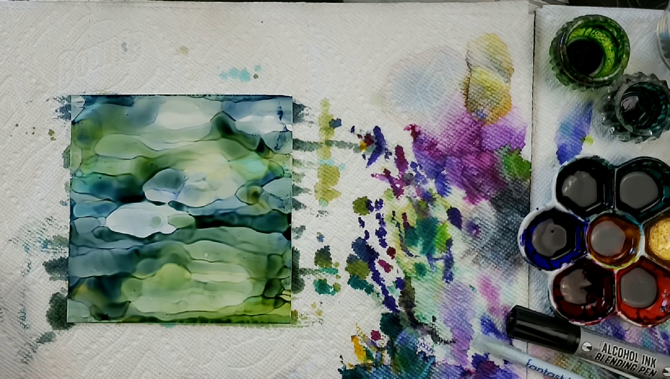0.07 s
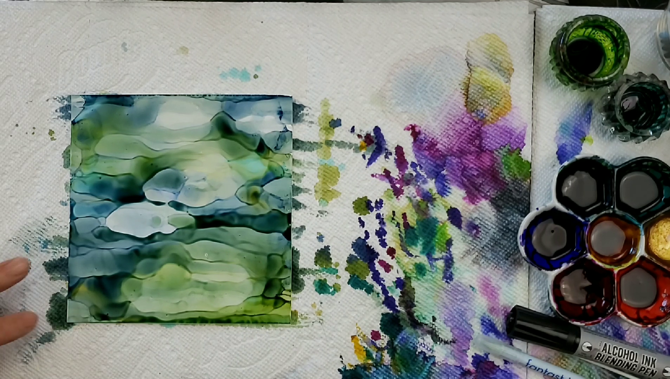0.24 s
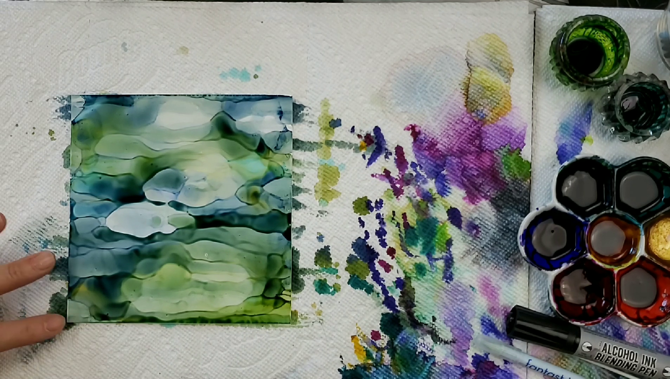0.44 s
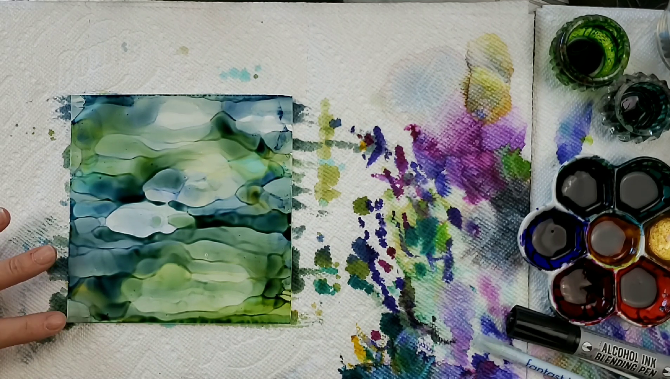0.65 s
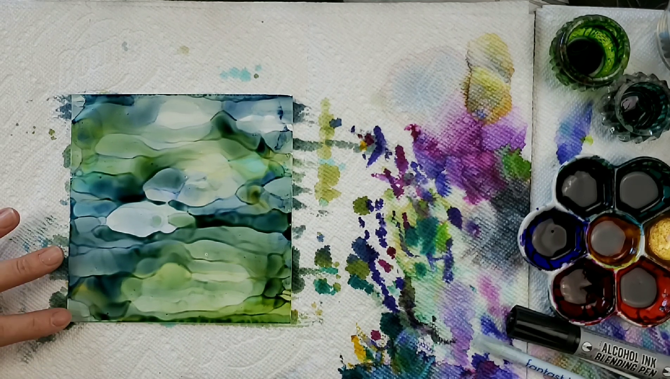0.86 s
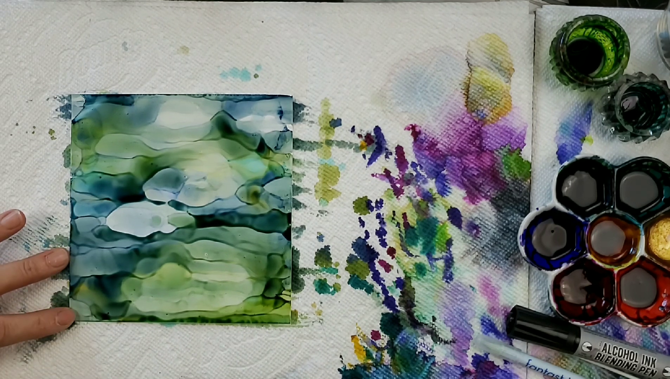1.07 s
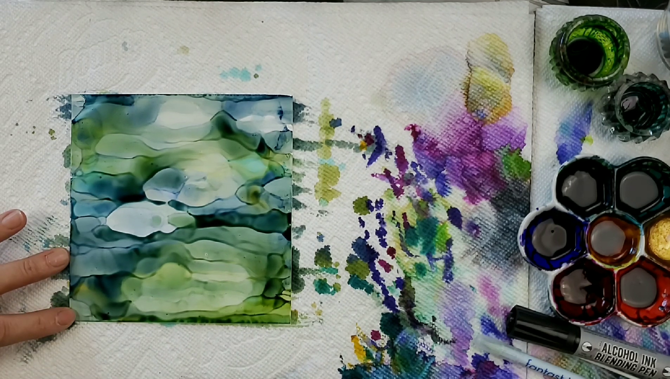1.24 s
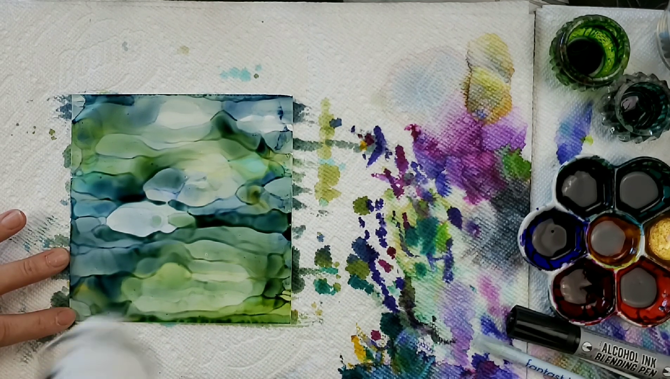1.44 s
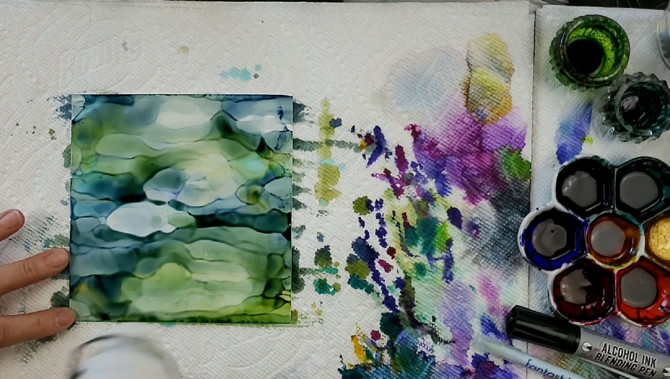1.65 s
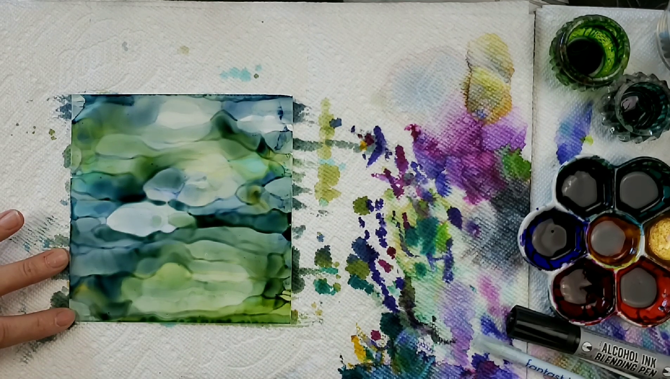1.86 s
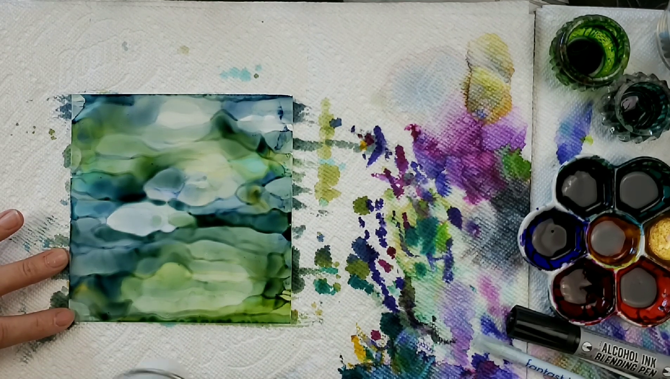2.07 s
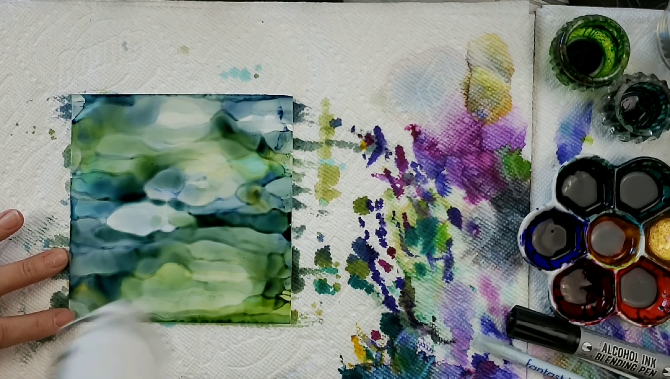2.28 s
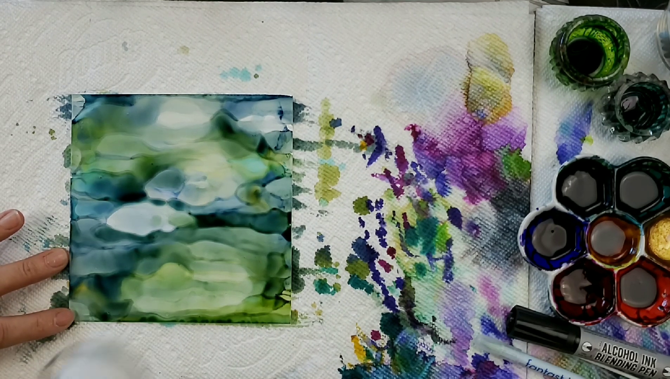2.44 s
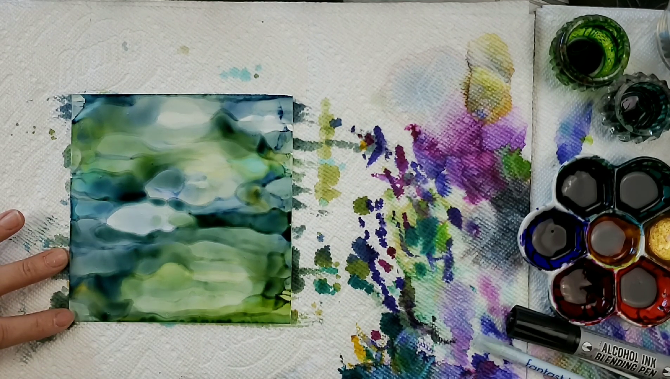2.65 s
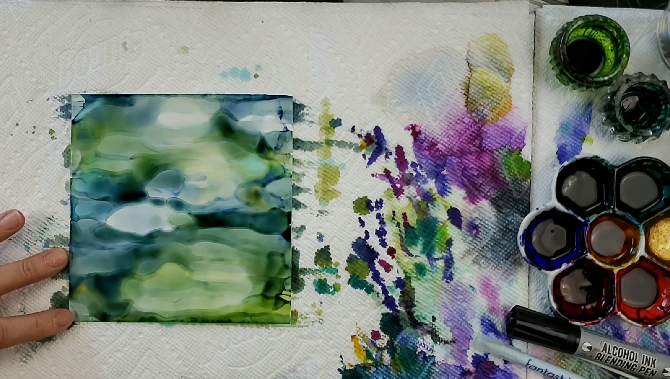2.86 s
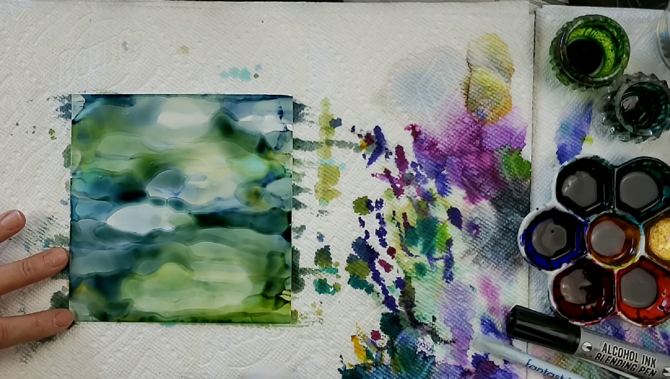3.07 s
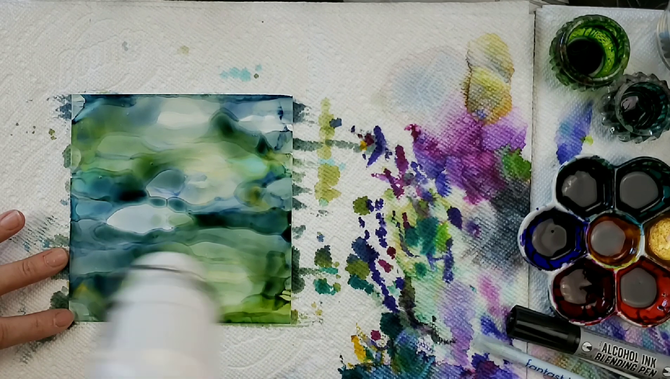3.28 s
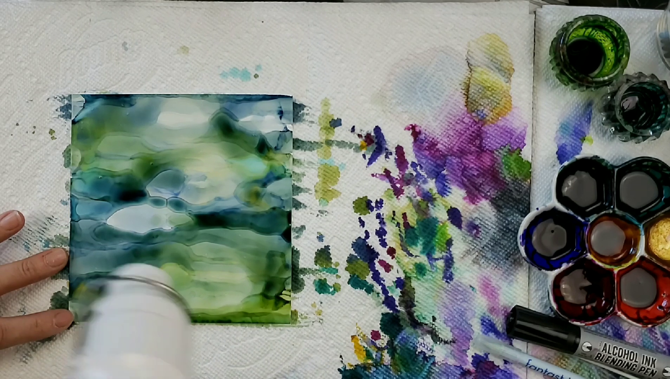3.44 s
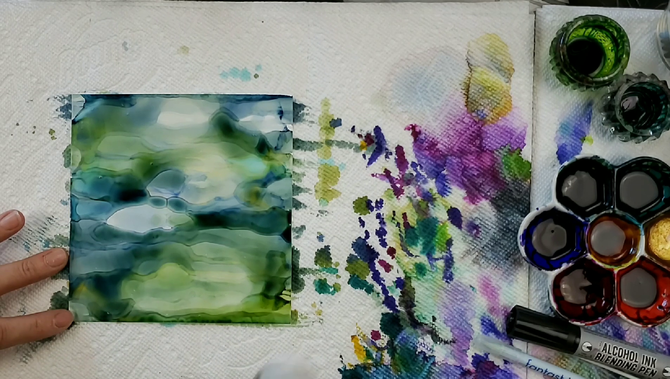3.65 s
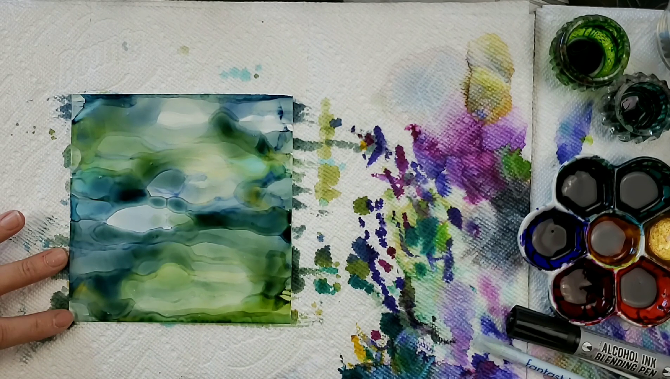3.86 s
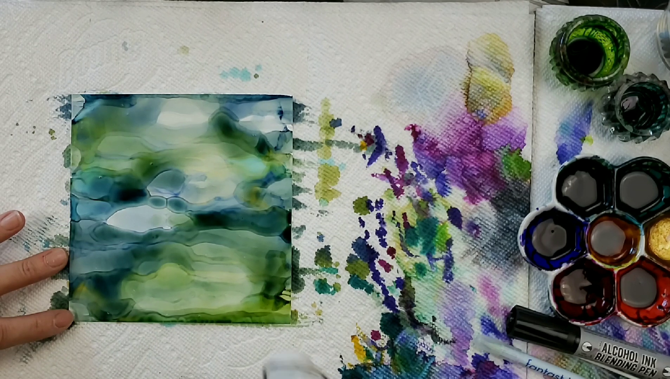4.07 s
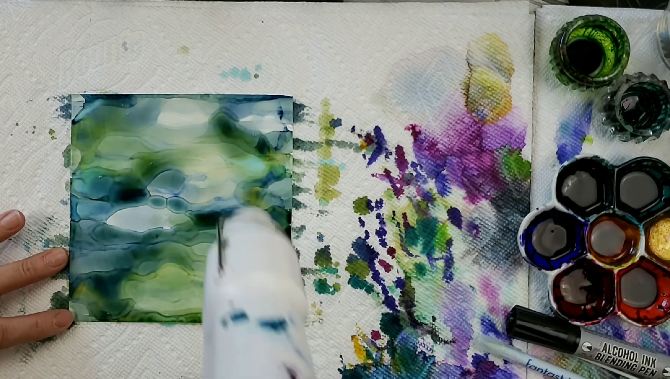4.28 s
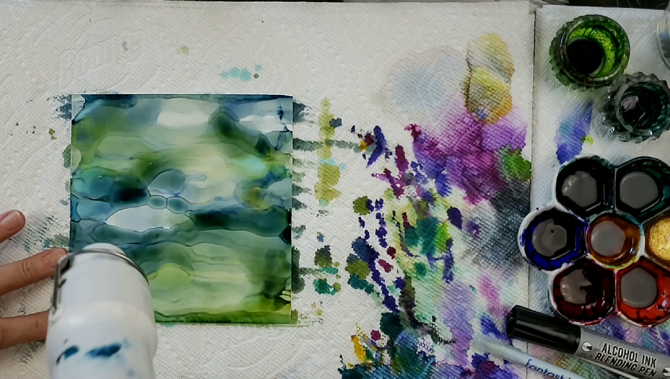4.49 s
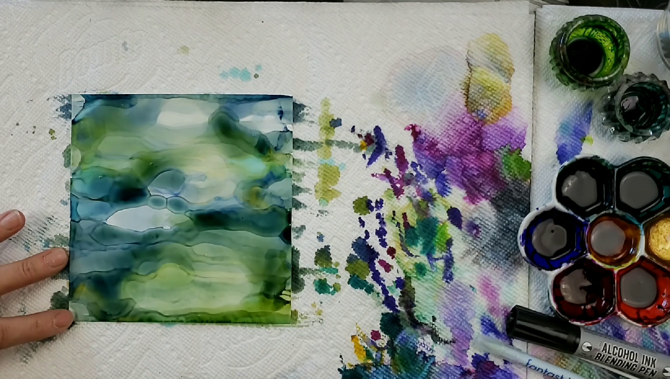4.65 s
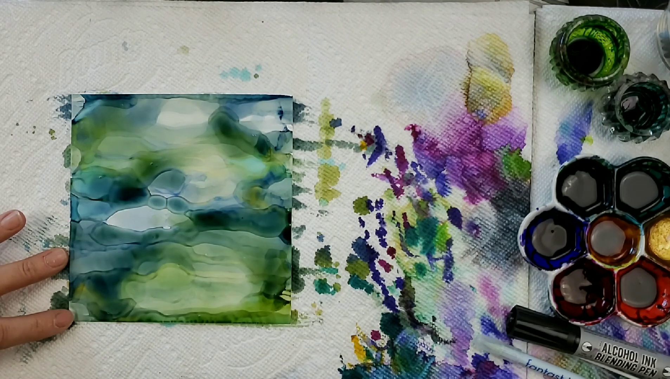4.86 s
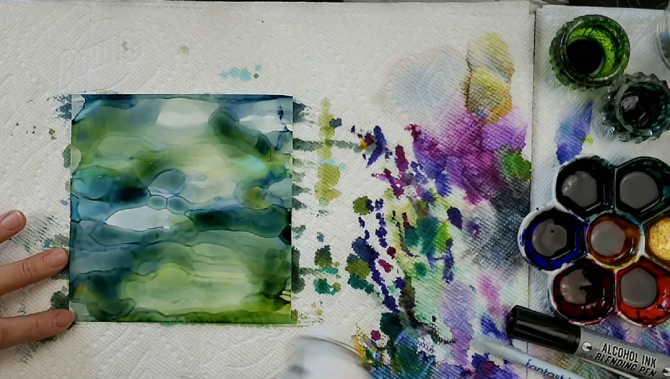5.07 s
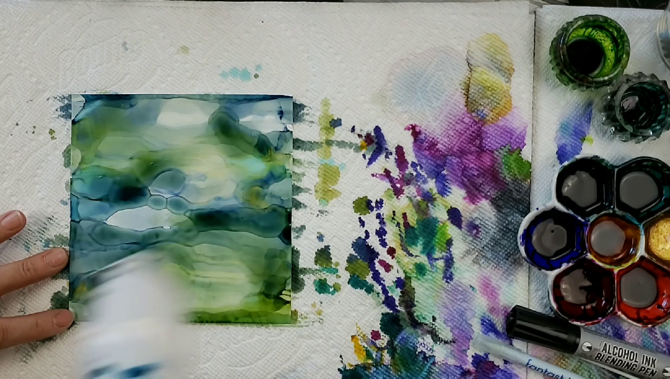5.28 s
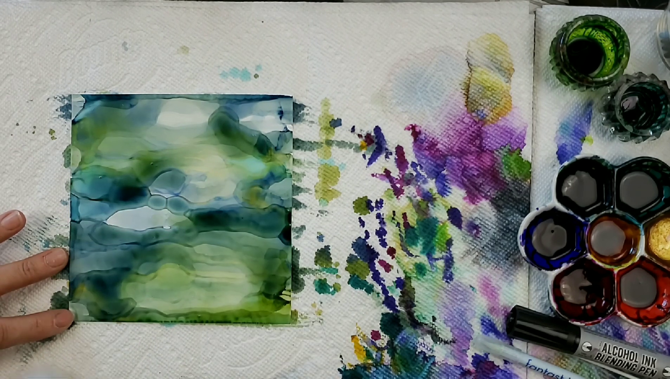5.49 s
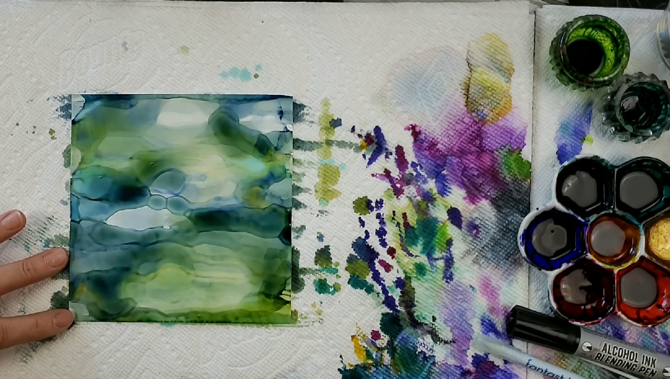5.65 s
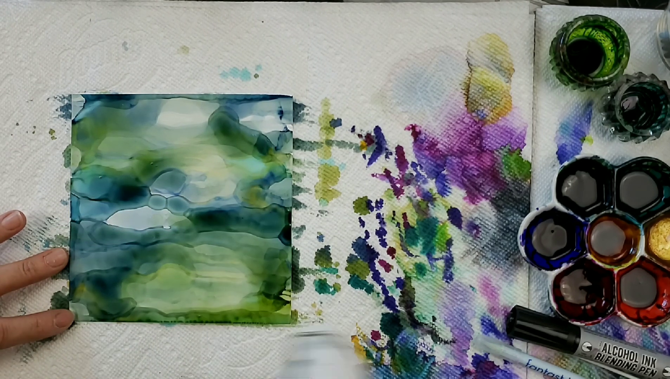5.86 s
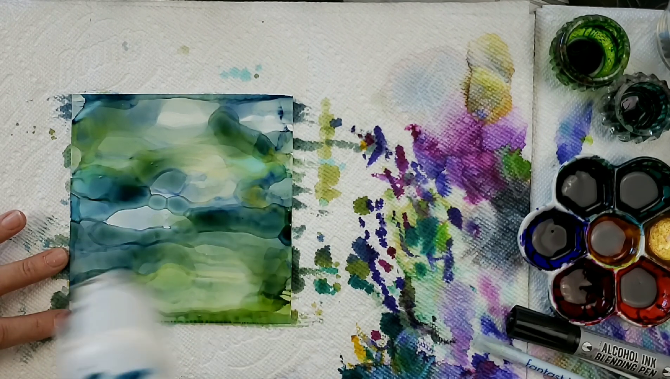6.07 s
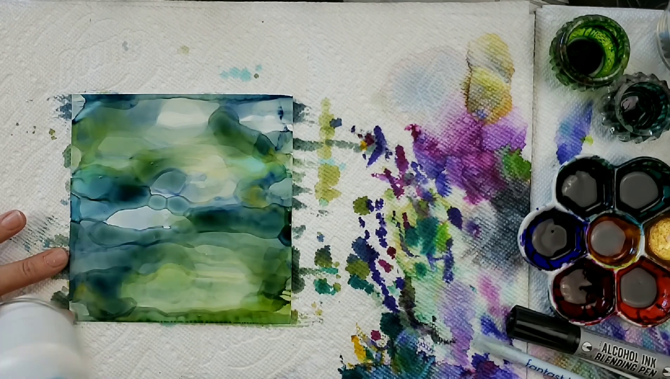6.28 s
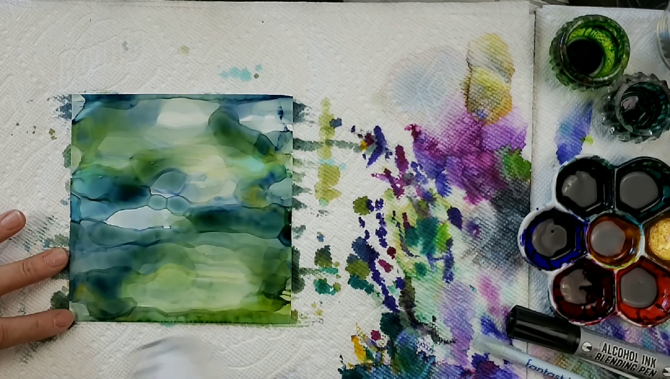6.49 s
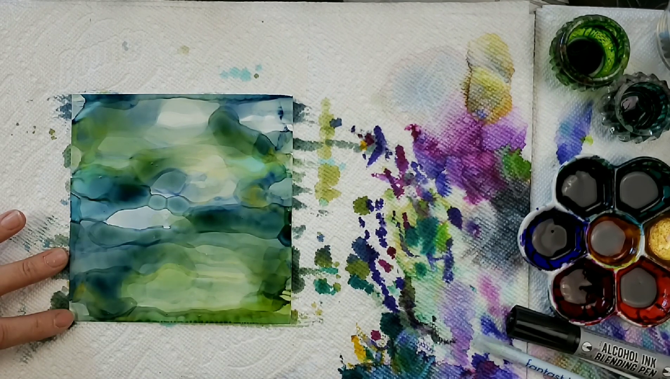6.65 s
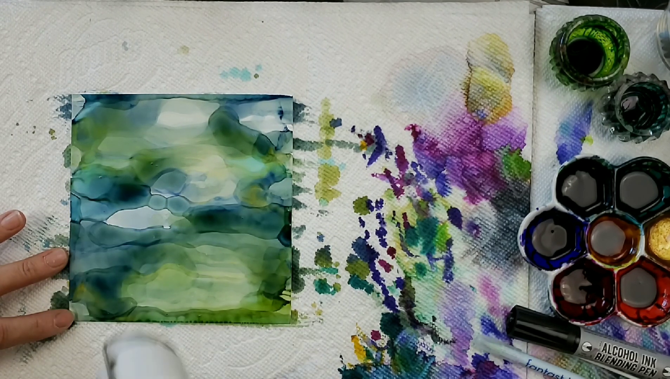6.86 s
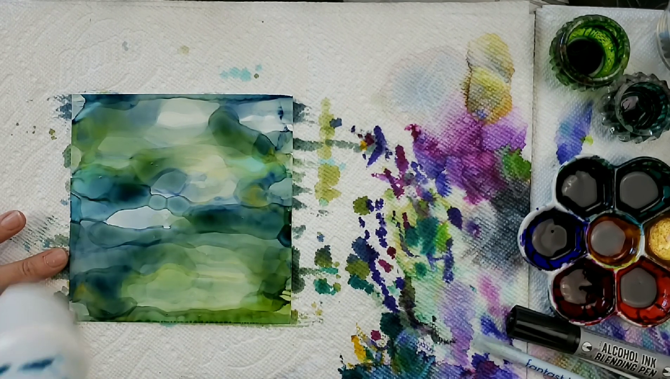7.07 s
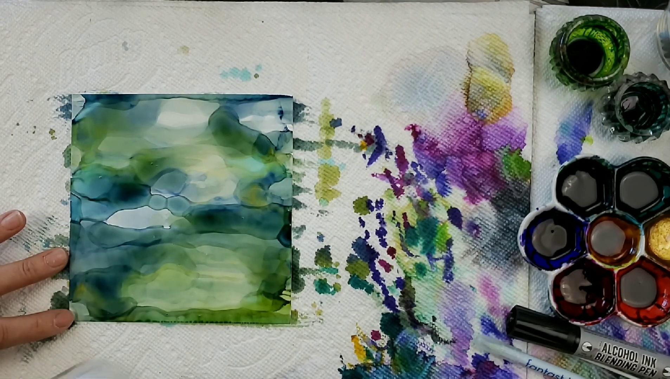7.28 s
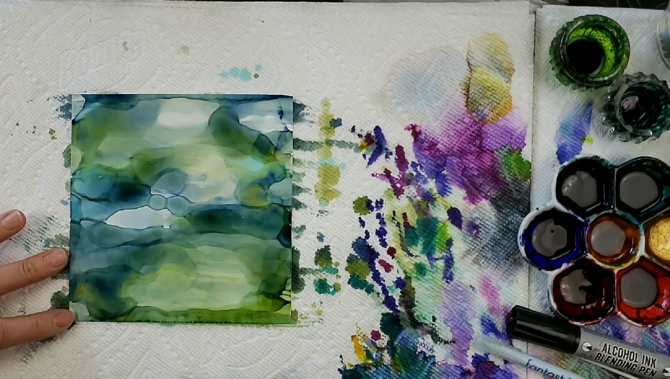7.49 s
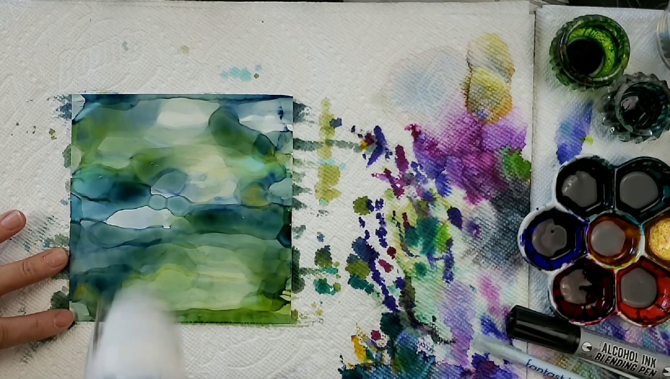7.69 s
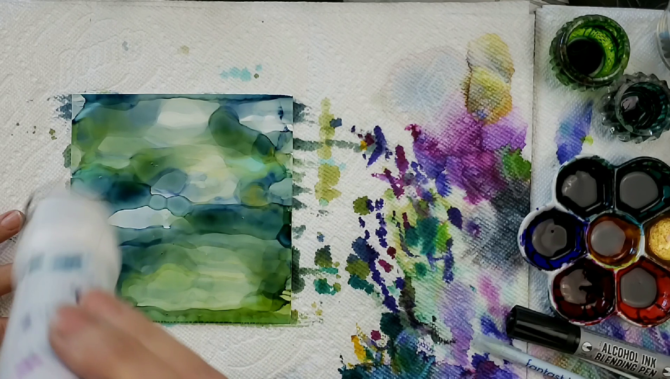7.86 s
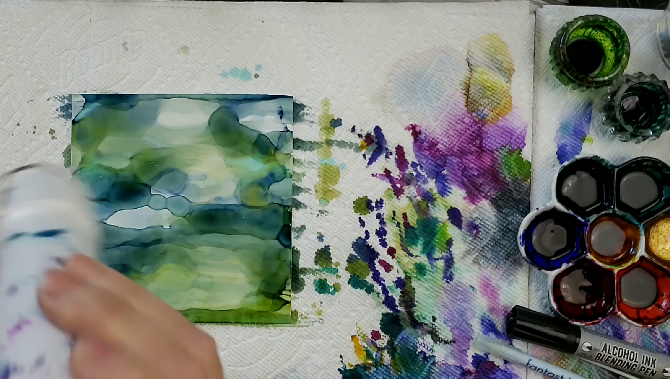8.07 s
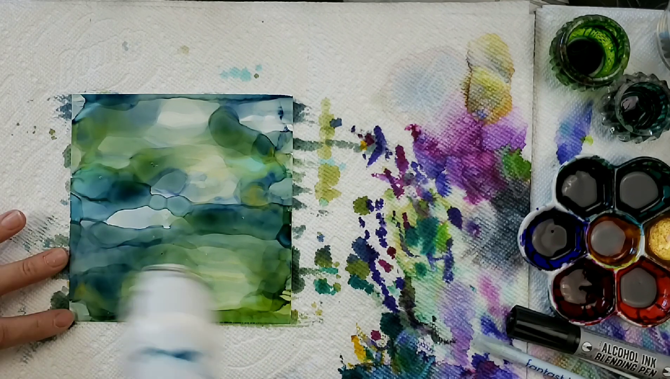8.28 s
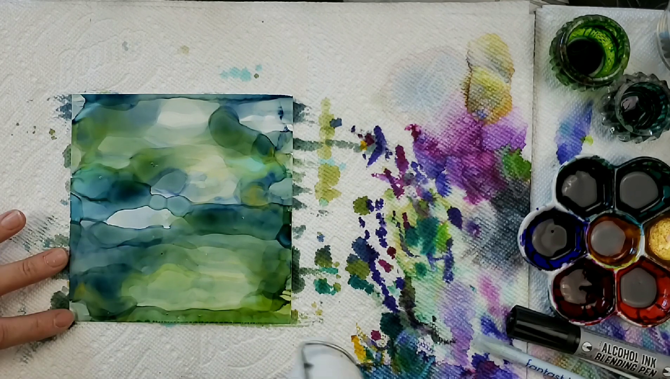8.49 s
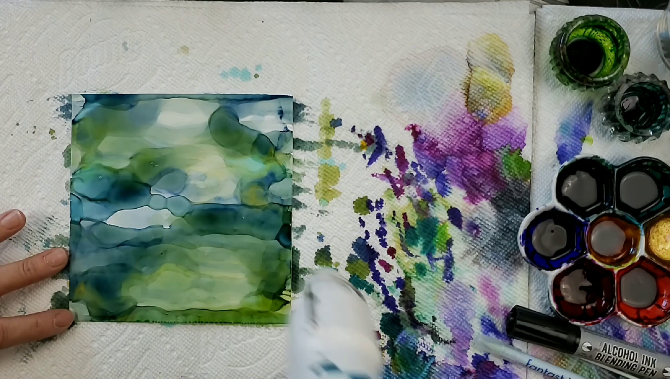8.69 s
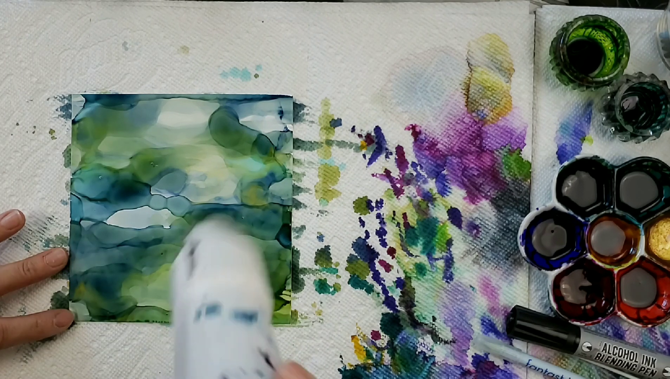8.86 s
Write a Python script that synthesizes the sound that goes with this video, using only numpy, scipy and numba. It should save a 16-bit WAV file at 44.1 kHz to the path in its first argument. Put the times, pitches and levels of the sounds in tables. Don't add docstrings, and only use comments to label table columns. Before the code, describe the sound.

In a quiet room, close to the microphone, a heat gun gives a soft knock on the table, then a loud crisp switch snap. Its motor immediately spins up, the whine climbing to a steady high pitch within about a second. Rushing air fills in underneath, growing nearer and brighter, then continues with slight swaying in level and tone as the tool is swept about.

```python
import sys
import numpy as np
from scipy import signal
from scipy.fft import rfft, irfft
from scipy.io import wavfile
from scipy.ndimage import uniform_filter1d, minimum_filter1d
from numba import njit

SR = 44100
rng = np.random.default_rng(int(sys.argv[2]) if len(sys.argv) > 2 else 0)


def natural_amplitude(level_db):
    exponent = np.asarray(level_db, float) / 20
    return 10 ** exponent


def store_pcm(level_fs):
    pcm = np.round(np.clip(level_fs, -1, 1) * 32767).astype(np.int16)
    wavfile.write(sys.argv[1], SR, np.atleast_2d(pcm).T)


N = 393813
TIME = np.arange(N) / SR
FREQ = np.maximum(np.fft.rfftfreq(N, 1 / SR), 1)
STEP = 64
SLOW = TIME[::STEP]

# frequency_hz, density_db_per_hz
ROOM_COLOUR = [(18, -40), (30, -9.5), (131, 4.5), (231, 2.5), (316, -47), (442, -15), (722, -30),
               (985, -29), (1090, -36), (2770, -30), (6180, -35), (8300, -58), (11000, -29), (14500, -39)]
ROOM_DB = -63.5
# time_s, level_db
RUSTLE = [(0, -64), (.04, -70), (.07, -73), (.13, -77)]

# start_s, level_db, length_s
GUSTS = [
    (1.975, -49, .1),
    (2.16, -52, .05),
    (2.27, -53, .13),
]
GUST_ATTACK_S, GUST_RELEASE_S = 0.011, 0.018

# start_s, peak_db, ring_t60_s, tail_db, tail_t60_s
KNOCK = [
    (.1235, -40.5, 0.36, -13, 0.37),
]
# start_s, peak_db, ring_t60_s, tail_db, tail_t60_s
SWITCH = [
    (.256, -67, 0.018, -6, 0.084),
    (.3535, -43, 0.022, -14, .1),
    (.3668, -11, 0.017, -13, 0.25),
]
# frequency_hz, density_db_per_hz
TABLE = [(60, -12), (140, -15), (450, 4), (900, -4), (2000, -17), (3500, -32), (8000, -48)]
# frequency_hz, density_db_per_hz
PLASTIC = [(290, -76), (500, -31), (1240, -40), (1800, -10.5), (2500, -14), (2800, -6), (3050, -10),
           (4050, -7.5), (5700, -26), (7360, -4), (12300, -13), (14000, -8), (15000, -11.5)]

# time_s, shaft_hz, nearness_db, nozzle_aim_db
HAND = [(1.25, 295.6, -1.7, -2.5), (1.6, 293.7, -1.1, 0.6), (2.2, 291.6, 0.0, 1.0),
        (2.45, 290.4, -1.4, -0.6), (2.85, 290.3, -0.8, 0.1), (3.2, 289.7, -0.4, -3.3),
        (3.55, 288.9, -0.9, 0.5), (4.1, 287.2, -2.3, -4.5), (4.68, 287.5, -3.8, 1.4),
        (4.95, 287.7, -1.6, -1.7), (5.15, 286.2, -3.3, -4.5), (5.5, 286.9, -2.5, 0.8),
        (5.9, 287.7, -1.5, -1.0), (6.1, 286.6, -3.0, -1.2), (6.4, 286.3, -1.0, 0.8),
        (7.3, 285.6, -0.2, -0.1), (8.5, 285.6, -1.0, 0.9), (8.75, 285.3, -3.5, -1.8)]
ARRIVE_S, ARRIVE_WIDTH_S, AWAY_DB = 1.03, .04, -9

START_S, KICK_HZ, KICK_HZ_PER_S = .39, 104, 830
CATCH_S = .5
# share_missing at CATCH_S, time_constant_s
LAGS = [
    (.1015, .064),
    (.217, .214),
]
WOBBLE_HZ = .2

AIR_HZ = (300, 700, 2800, 6700, 11700)
# frequency_hz, density_db_per_hz
RUSH = [(30, -49), (120, -30), (300, -18.5), (430, -17), (1080, -23.5), (1900, -13), (2800, -12.5),
        (4150, -19.5), (5800, -21), (6800, -17), (8500, -24), (11300, -14), (13000, -17.5), (14400, -19.5)]
# frequency_hz, width_hz, density_db_per_hz
BARREL = [(679, 98, 1.5), (794, 227, -6.5), (1467, 376, -4), (3195, 82, -12.5), (3770, 450, -18)]
# frequency_hz, side_minus_mid_db
SIDE = [(60, -9), (110, 2.5), (200, -19), (380, -12.5), (700, -20), (1290, -14.5), (2380, -18), (4400, -11),
        (8120, -9.5), (15000, -13)]
# frequency_hz, left_minus_right_db
LEAN = [(60, -0.5), (110, -4.5), (200, -1), (380, 0.5), (700, 1.0), (1290, 0.5), (2380, 2), (4400, 0),
        (8120, 3), (15000, -4)]
# time_s, level_db
INTAKE = [(.4, -74), (.47, -54), (.9, -53), (1.3, -53), (1.8, -84)]
FLOW_SLOPE_DB = 51
EARLY_SHARE = 0.28
HISS_DB = (-40.5, -38, -38.5)
HISS_AIM = (0.42, 1, 0.96)
HISS_AWAY_DB = (-4, -1.5, -3.5)
HISS_ARRIVE_S, HISS_ARRIVE_WIDTH_S = 0.87, 0.071
BORE_DB, BORE_AIM = -41, 0.27
COLD_DB, WARM_S = 5.5, 2.5
FILL_DB, FILL_S, FILL_WIDTH_S = -7.5, 1.15, 0.081
AIR_START_S, AIR_ATTACK_S = 0.403, .02

BLADES, BLADE_DB = 5, -28
# frequency_hz, gain_db
HOUSING = [(520, -50), (640, -15), (1170, -8), (1255, 2), (1330, 8.5), (1375, 1.5), (1405, -0.5),
           (1430, 0.5)]
# time_s, depth_db, width_s
NULLS = [
    (.782, -13, .018),
    (.878, -8, .02),
    (.995, -4, .03),
]
SINGERS = (6, 10, 23, 38, 50)
SINGER_DB = (-62.5, -59.5, -63.5, -55.5, -51)
SINGER_SLOPE_DB = 51
# time_s, shaft_order, level_db, width_s
SWELLS = [(.93, 6, -48, .27), (.53, 10, -59, .04), (.79, 10, -49, .1), (1.09, 10, -48, .09),
          (1.42, 10, -50, .22), (2.0, 23, -47, .3), (2.2, 38, -54, .3), (2.75, 50, -50, .3),
          (2.85, 10, -54, .3), (4.65, 23, -55, .15), (7.0, 38, -50, .6), (7.6, 38, -51, .3),
          (7.2, 7, -56, 3), (7.4, 8, -57, 3), (7.7, 10, -59, 1.5), (7.75, 50, -52, .1),
          (8.57, 38, -47, .14), (8.5, 50, -52, .15)]
# shaft_order, level_db
COMB = [(1, -61), (2, -80), (3, -58), (4, -67), (7, -55), (8, -57), (9, -60), (11, -70), (12, -66),
        (13, -66), (14, -67), (15, -61), (16, -61), (17, -63), (18, -66), (19, -60), (20, -61), (21, -67),
        (22, -70), (24, -64), (25, -64), (26, -60), (27, -69), (28, -63), (29, -67), (30, -67), (31, -60),
        (32, -60), (33, -58), (34, -61), (35, -58), (36, -56), (37, -58), (39, -54), (40, -56), (41, -55),
        (42, -55), (43, -54), (44, -54), (45, -53), (46, -58), (47, -59), (48, -57), (49, -58)]
# shaft_order, time_s, width_s, level_db
CASING = (16, .75, .065, -48)
SHY_DB = -24
BLINK_DB, BLINK_PER_S = 5, 18
STIFF_DB, LOOSE_S = -3, 3.5
RIPPLE_HZ = 120
# time_s, level_db
INRUSH = [(.38, -80), (.39, -74), (.45, -60), (.49, -57), (.6, -75)]
TOP_HZ = 14530


def fast(slow):
    return np.interp(TIME, SLOW, slow)


def curves(table, start=None):
    s, *columns = np.transpose(table)
    return [np.interp(SLOW, s, column, left=start) for column in columns]


def until(s, width):
    return .5 - .5 * np.tanh((SLOW - s) / width / 2)


def bump(s, width):
    return np.exp(-((SLOW - s) / width) ** 2)


def walk(rate):
    k = int(SR / STEP / rate)
    draws = rng.standard_normal(len(SLOW) // 8)[:len(SLOW) // k + 1]
    steps = np.repeat(draws, k)
    return 1.435 * uniform_filter1d(uniform_filter1d(steps, k), k)[:len(SLOW)]


def gains(points):
    hz, db = np.transpose([(max(f, 1), d) for f, d in points])
    return natural_amplitude(np.interp(np.log(FREQ), np.log(hz), db))


def noise(gain, channels=1):
    x = irfft(rfft(rng.standard_normal((channels, N))) * gain, N)
    return x / np.sqrt(np.mean(x ** 2))


def pair(mid, side, lean_db):
    balance = natural_amplitude(np.array([[lean_db], [-lean_db]]) / 2)
    return mid * balance + side * np.array([[1], [-1]])


def room():
    mid, side = noise(gains(ROOM_COLOUR), channels=2)
    tone = pair(mid, 0.086 * side, 0) * fast(natural_amplitude(ROOM_DB + 3.04 * walk(15)))
    cloth, other = noise(gains([(300, -14), (2500, -8), (8500, -10), (15000, -3.5)]), channels=2)
    fade = natural_amplitude(curves(RUSTLE)[0]) * (SLOW < RUSTLE[-1][0])
    return tone + pair(cloth, .4 * other, 0) * fast(fade)


def buffet():
    gust = 0
    for s, db, length in GUSTS:
        attack = np.clip((SLOW - s) / GUST_ATTACK_S, 0, 1)
        release = np.exp(-np.maximum(SLOW - s - length, 0) / GUST_RELEASE_S)
        gust = gust + natural_amplitude(db - 0.5) * attack * release
    low, side = noise(gains([(15, -14), (45, -6.0), (110, -10), (300, -8), (700, -48)]), channels=2)
    return pair(low, 0.15 * side, 0) * fast(gust)


def hits(events, colour):
    ring = noise(gains(colour))
    tail = noise(gains(colour), channels=2)
    out = 0
    for s, db, t60, tail_db, tail_t60 in events:
        age = np.maximum(TIME - s, 0)
        rise = np.minimum(age / 0.00038, 1)
        direct = natural_amplitude(-60 * age / t60) * ring
        wet = natural_amplitude(tail_db - 60 * age / tail_t60) * (ring + 0.43 * tail)
        out = out + natural_amplitude(db - 10.0) * rise * (direct + wet)
    return out


def shaft():
    since = CATCH_S - np.maximum(SLOW, START_S)
    lag = sum(share * np.exp(since / time_constant) for share, time_constant in LAGS)
    pull = (KICK_HZ + KICK_HZ_PER_S * np.maximum(SLOW - START_S, 0)) * (SLOW < CATCH_S)
    return np.maximum(curves(HAND)[0] * (1 - lag), pull) + WOBBLE_HZ * walk(7)


def sway(hz):
    aim_db = curves(HAND)[2]
    speed_db = FLOW_SLOPE_DB * np.log10(hz / 288)
    flow_db = speed_db - 40 * until(AIR_START_S, AIR_ATTACK_S / 2)
    cold_db = COLD_DB * np.exp(-SLOW / WARM_S)
    fill_db = FILL_DB * until(FILL_S, FILL_WIDTH_S)
    bore_db = BORE_DB + flow_db + cold_db + BORE_AIM * aim_db + fill_db
    rumble_db = bore_db + .5 * np.minimum(bore_db + 43, 0)
    away = until(HISS_ARRIVE_S, HISS_ARRIVE_WIDTH_S)
    early_db = flow_db - EARLY_SHARE * speed_db
    hiss_db = [db + early_db + share * aim_db + far_db * away
               for db, share, far_db in zip(HISS_DB, HISS_AIM, HISS_AWAY_DB)]
    return np.array([rumble_db, bore_db, *hiss_db])


def air(turn, sway_db):
    power = gains(RUSH) ** 2
    for f, width, db in BARREL:
        power = power + natural_amplitude(db) ** 2 / (1 + (2 * (FREQ - f) / width) ** 2) ** 2
    mid = rfft(noise(np.sqrt(power))[0])
    side = rfft(noise(np.sqrt(power))[0]) * gains(SIDE) * natural_amplitude(-1.5)
    lean = np.sqrt(gains(LEAN))
    both = np.array([mid * lean + side, mid / lean - side])
    octave = np.maximum(np.log2(FREQ), 5.5)
    wake = np.cos(turn)
    out = 0
    for centre in np.arange(5.5, 14.5, .5):
        share = np.clip(1 - 2 * abs(octave - centre), 0, 1)
        place = np.interp(centre, np.log2(AIR_HZ), np.arange(len(AIR_HZ)))
        low = min(int(place), len(AIR_HZ) - 2)
        db = sway_db[low] + (place - low) * (sway_db[low + 1] - sway_db[low]) + 1.03 * walk(12)
        chop = 1 + 0.07 * min(2 ** centre / 8000, 1) * wake
        out = out + irfft(both * share, N) * (fast(natural_amplitude(db + 6.5)) * chop)
    hollow = noise(1 / (1 + (2 * (FREQ - 500) / 130) ** 2))
    intake = natural_amplitude(curves(INTAKE, start=-120)[0]) * (SLOW < INTAKE[-1][0])
    return out + hollow * fast(intake)


@njit
def sines(turn, orders, size, step):
    out = np.zeros((2, len(turn)))
    for i in range(len(turn)):
        j = min(i // step, size.shape[2] - 2)
        part = i / step - j
        base, power, z = np.exp(1j * turn[i]), 0, 1 + 0j
        for k in range(len(orders)):
            while power < orders[k]:
                z, power = z * base, power + 1
            for c in range(2):
                out[c, i] += (z * (size[c, k, j] * (1 - part) + size[c, k, j + 1] * part)).imag
    return out


def blade_tone(hz):
    near_db = curves(HAND)[1]
    house_hz, house_db = np.transpose(HOUSING)
    db = BLADE_DB + near_db + np.interp(BLADES * hz, house_hz, house_db)
    db = db + AWAY_DB * until(ARRIVE_S, ARRIVE_WIDTH_S)
    db = db + sum(depth_db * bump(s, width) for s, depth_db, width in NULLS)
    db = db + .5 * walk(25) + 0.63 * walk(6.7)
    return pair(natural_amplitude(db) + 0j, 0, 1.76)


def order_levels(hz):
    aim_db = curves(HAND)[2]
    speed = np.log10(hz / 288)
    shy_db = SHY_DB * until(ARRIVE_S, 0.081)
    cold_db = STIFF_DB * until(LOOSE_S, 0.75)
    level = {}
    for k, db in zip(SINGERS, SINGER_DB):
        rest = natural_amplitude(db + 1.6 * walk(3.18))
        level[k] = rest * natural_amplitude(SINGER_SLOPE_DB * speed + shy_db * (k / 50) ** 2)
    for k, db in COMB:
        beam_db = (aim_db + 3.0 + shy_db / 4) * k / 50
        level[round(k)] = natural_amplitude(db + 170 * speed + 1.2 * walk(2.5) + cold_db + beam_db)
    for s, k, db, width in SWELLS:
        level[k] = level[k] + natural_amplitude(db + SINGER_SLOPE_DB * speed) * bump(s, width)
    return level


def winding_buzz():
    level = natural_amplitude(curves(INRUSH, start=-120)[0]) * (SLOW < INRUSH[-1][0])
    return fast(level) * np.sqrt(2) * np.sin(2 * np.pi * 10 * RIPPLE_HZ * TIME)


def rotor(hz):
    ripple = np.sin(2 * np.pi * RIPPLE_HZ * TIME)
    turn = 2 * np.pi * np.cumsum(fast(hz)) / SR + 0.014 * ripple
    size = {}
    for k, level in order_levels(hz).items():
        steady, spread = (1.25, .3) if k in SINGERS else (.8, min(.2 * k, .55))
        scatter = spread * (walk(24) + 1j * walk(24))
        blink = natural_amplitude(BLINK_DB * (.5 + k / 80) * np.tanh(walk(BLINK_PER_S)))
        phase = np.exp(1j * rng.uniform(0, 2 * np.pi))
        waver = level * blink * (steady + scatter) * phase
        size[k] = pair(waver, .25j * walk(1.506) * waver, .3)
    order, s, width, db = CASING
    size[round(order)] = size[round(order)] + natural_amplitude(db) * bump(s, width)
    size[BLADES] = blade_tone(hz)
    orders = np.array(sorted(size))
    sizes = np.sqrt(2) * np.stack([size[k] for k in orders], axis=1) * (SLOW > START_S)
    return sines(turn, orders, sizes, STEP) + winding_buzz(), turn


def scene():
    hz = shaft()
    whine, turn = rotor(hz)
    blows = hits(KNOCK, TABLE) + hits(SWITCH, PLASTIC)
    return room() + buffet() + blows + air(turn, sway(hz)) + whine


def keep(near, limit, floor_db):
    return np.maximum(near ** 3 / (near ** 3 + limit ** 3 + 1e-60), natural_amplitude(floor_db))


def thrift(x, edge_hz, under_db, slope_db):
    hz, _, z = signal.stft(x, SR, nperseg=2048)
    power = np.mean(abs(z) ** 2, axis=0)
    total = power.sum(axis=0)
    near = uniform_filter1d(power, size=3, axis=0)
    low = hz < edge_hz
    thin = (hz > 3200) & (hz < 9500)
    limit = total * natural_amplitude(under_db + slope_db * (1.5 - hz[low, None] / edge_hz)) ** 2
    z[:, low] *= keep(near[low], limit, floor_db=-11)
    steady = total < 6 * minimum_filter1d(total, size=5)
    held = uniform_filter1d(near, size=3, axis=1)
    mask = uniform_filter1d(held, size=60, axis=0) * natural_amplitude(-4.8) ** 2
    z[:, thin] *= np.where(steady, keep(held, mask, floor_db=-14), 1)[thin]
    z[:, hz > TOP_HZ] = 0
    return signal.istft(z, SR, nperseg=2048)[1][:, :N]


def top_cut(x):
    return signal.sosfilt(signal.butter(12, 15700, fs=SR, output="sos"), x)


def record(dry):
    mix = thrift(dry, edge_hz=200, under_db=-49.5, slope_db=8.5)
    return top_cut(mix)


dry = scene()
out = record(dry)
store_pcm(out)
```